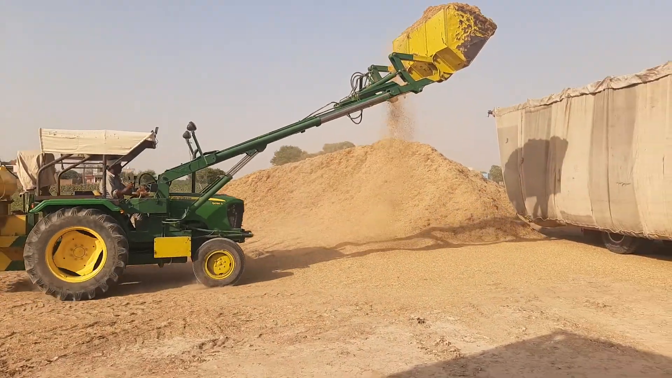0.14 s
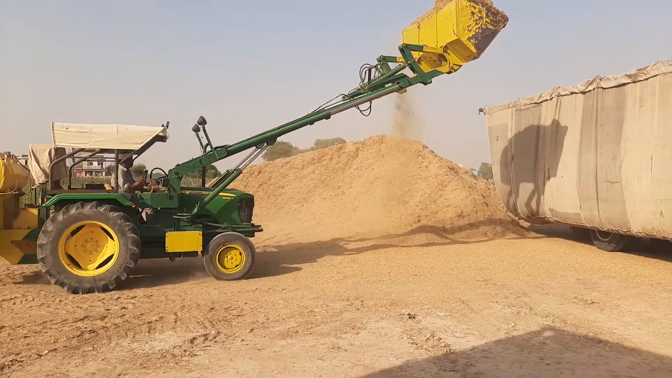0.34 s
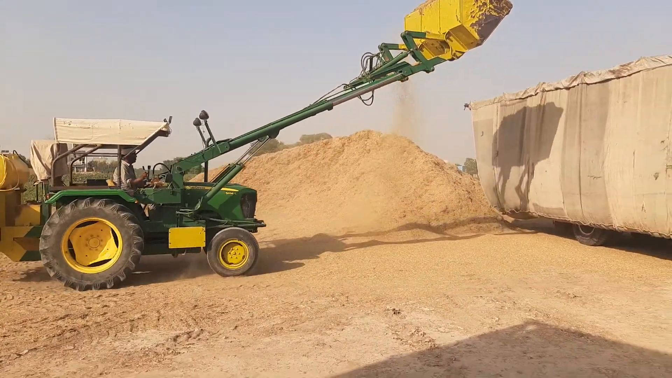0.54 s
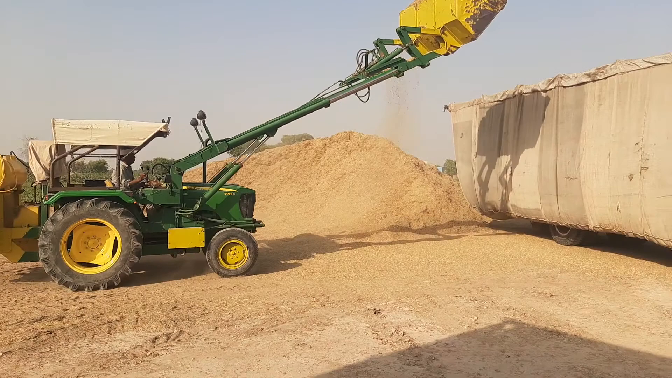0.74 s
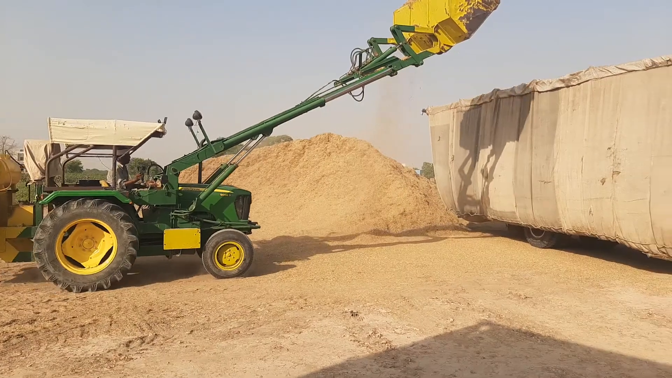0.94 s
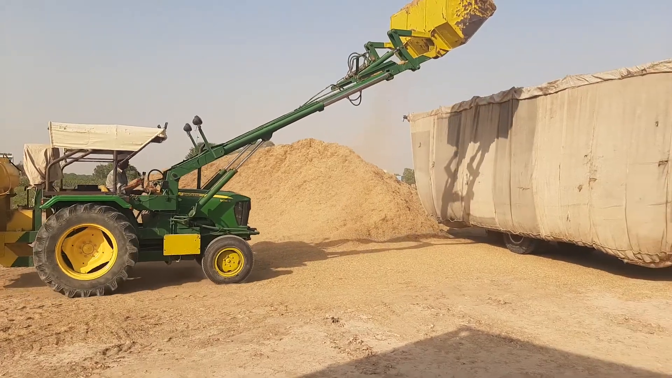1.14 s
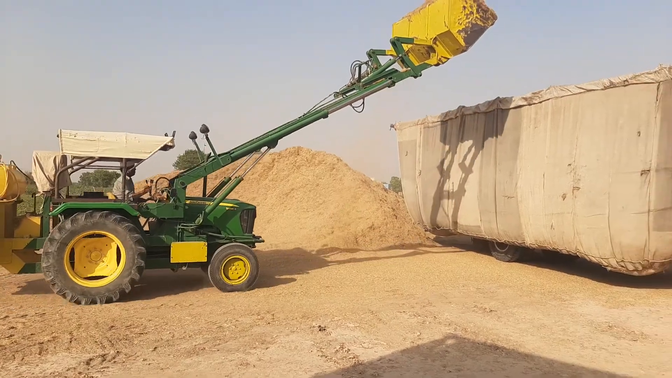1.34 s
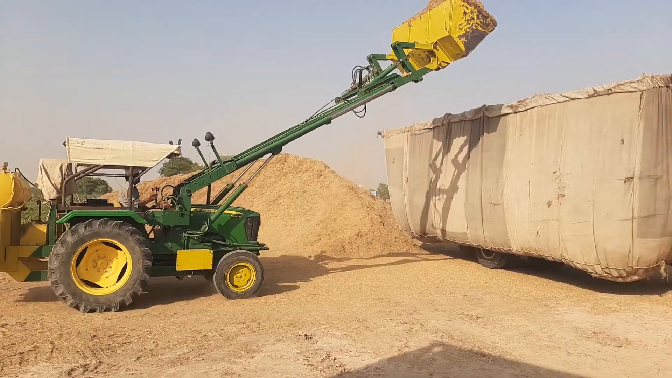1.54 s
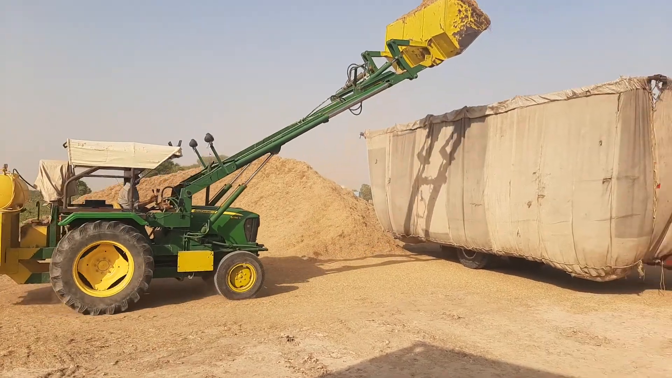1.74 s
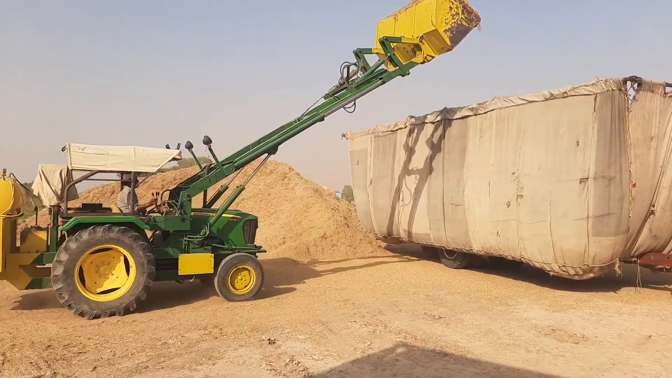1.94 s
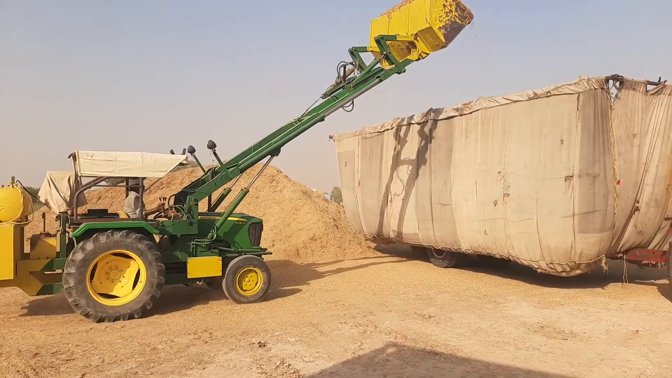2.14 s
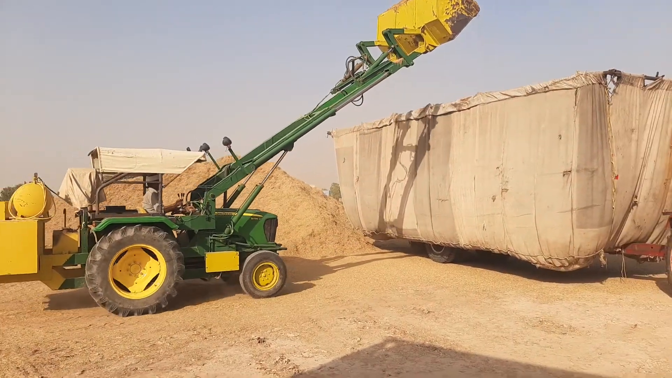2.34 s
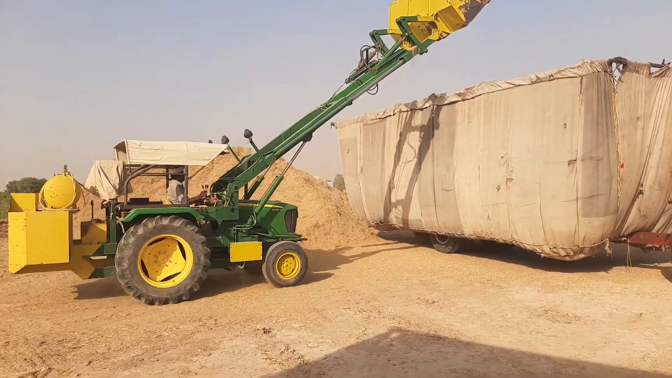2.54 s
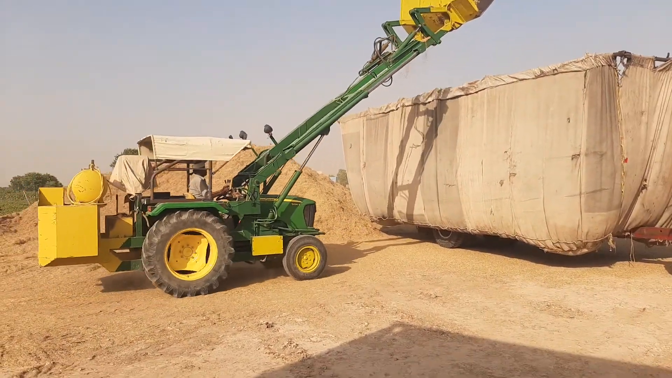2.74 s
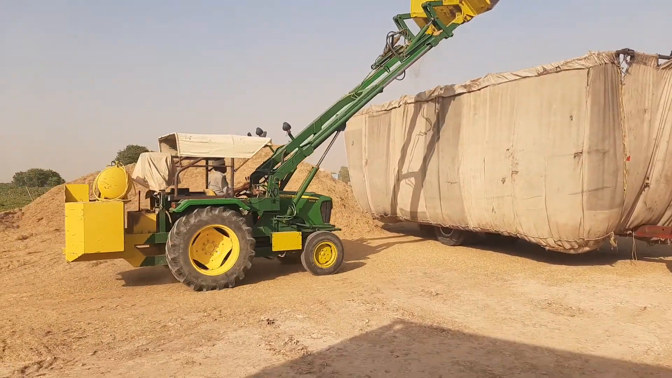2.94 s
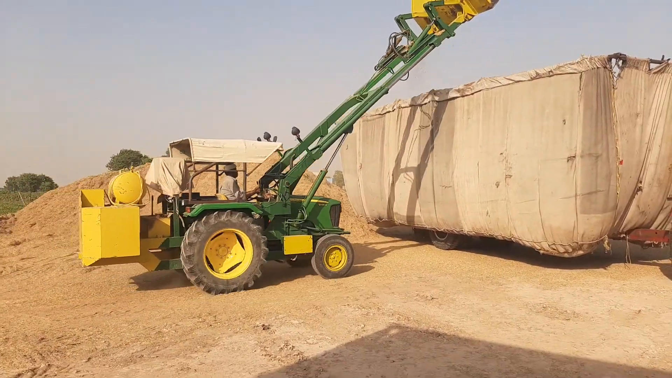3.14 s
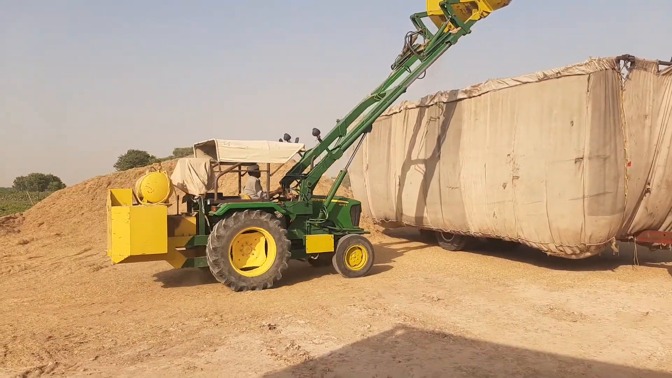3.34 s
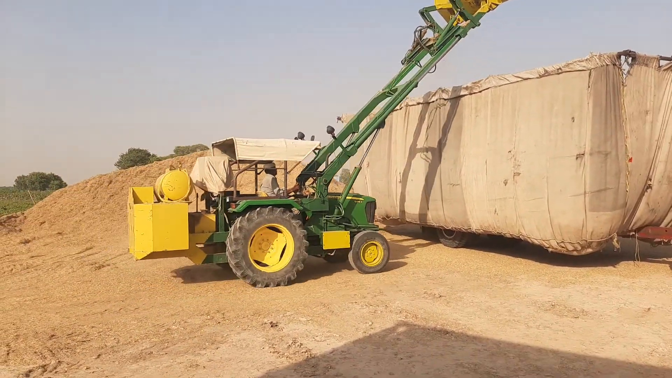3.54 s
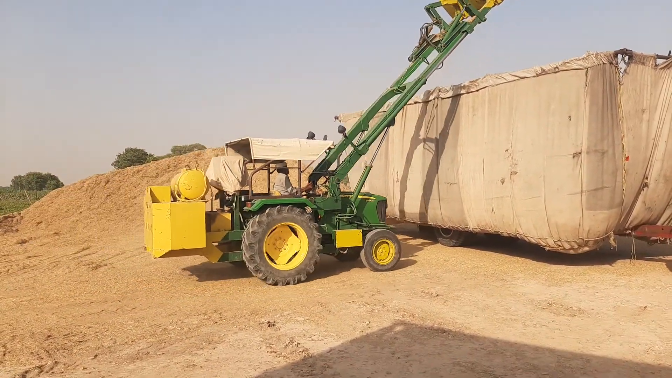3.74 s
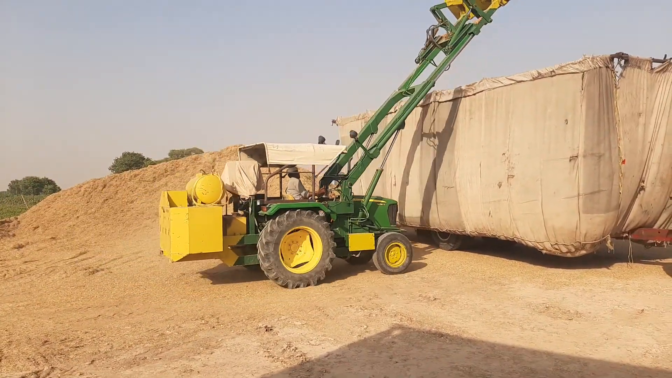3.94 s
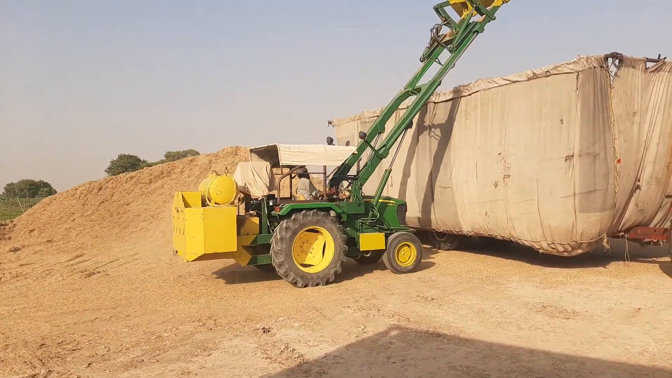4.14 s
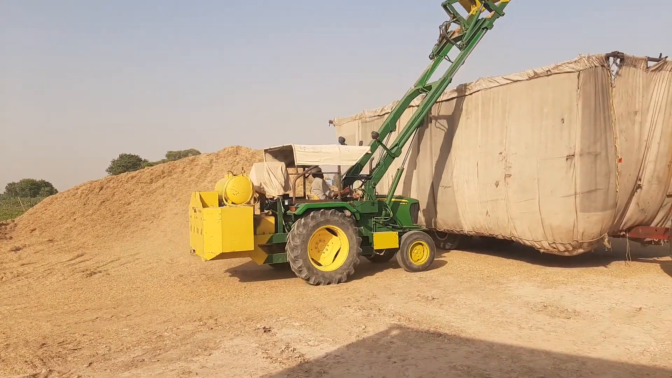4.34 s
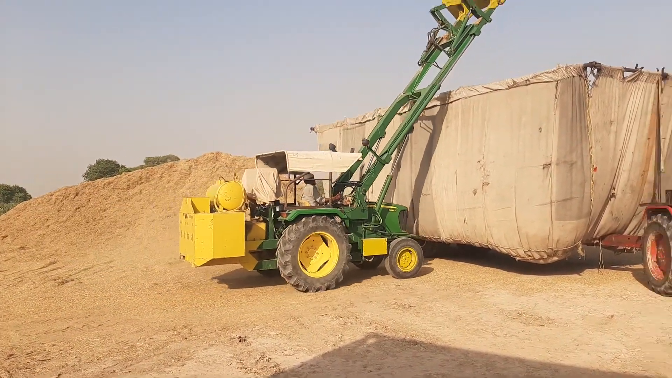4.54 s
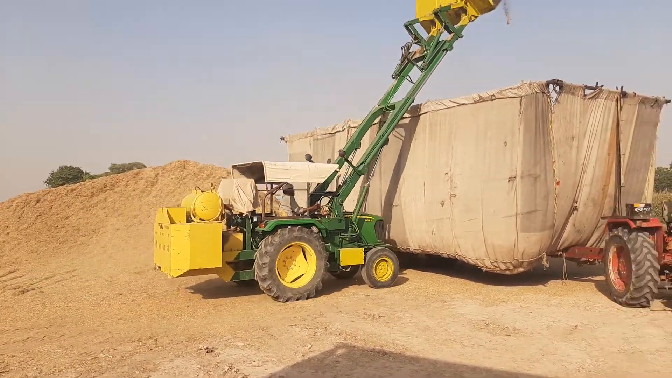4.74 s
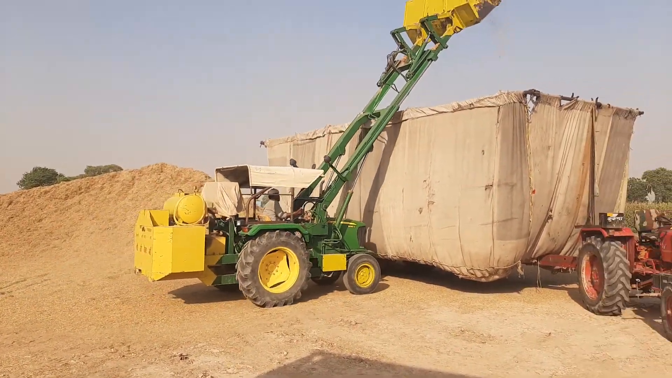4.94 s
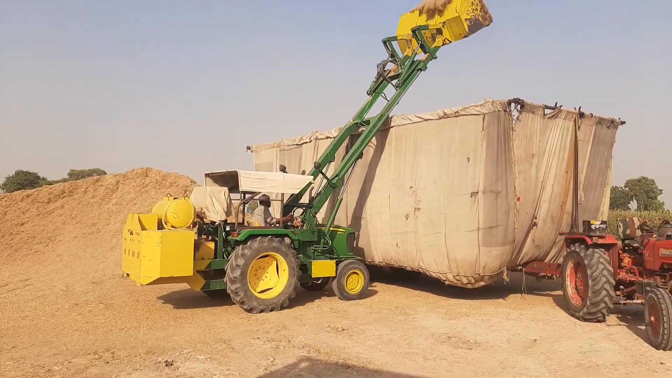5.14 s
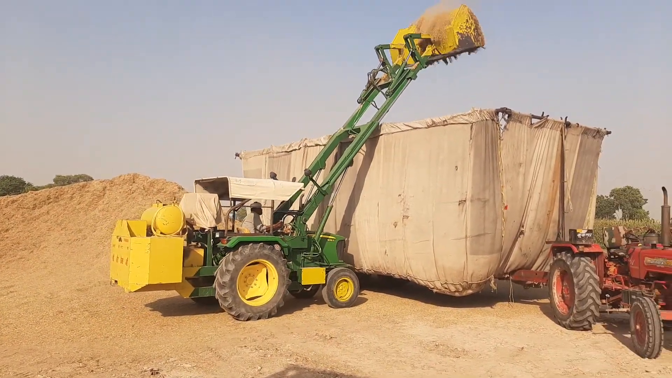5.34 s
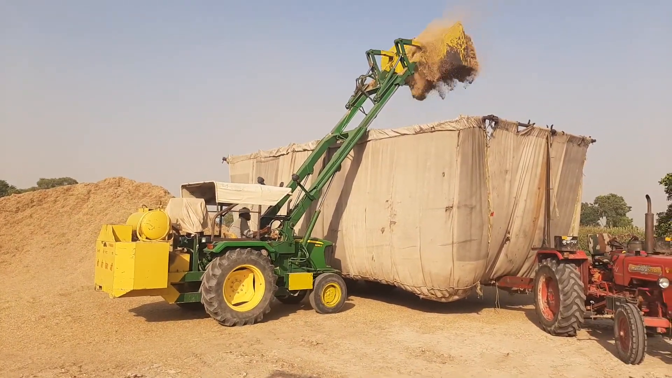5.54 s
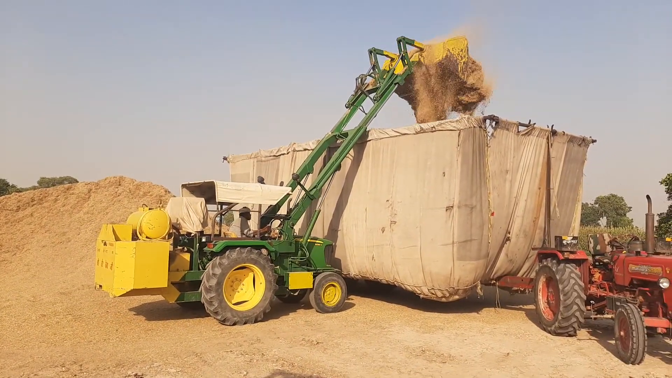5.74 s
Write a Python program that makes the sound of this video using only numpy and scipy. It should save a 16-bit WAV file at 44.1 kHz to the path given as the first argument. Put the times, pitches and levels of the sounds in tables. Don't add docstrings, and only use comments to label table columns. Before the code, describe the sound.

Outdoors in an open yard, a diesel tractor works under load with a deep humming exhaust, clattering block, fan roar and wavering hydraulic pump whine. Just before four seconds the throttle lifts; the pitch slides down and the roar thins. Short metallic loader knocks follow, then a slow, lumpy idle. A small two-port microphone hears it from fairly close.

```python
import sys
import numpy as np
from scipy import signal
from scipy.io import wavfile
from scipy.ndimage import uniform_filter1d

SR = 44100
rng = np.random.default_rng(int(sys.argv[2]) if len(sys.argv) > 2 else 0)


def to_wav(s):
    ch = np.atleast_2d(s).T
    pcm = np.round(np.clip(ch, -1, 1) * 32767)
    wavfile.write(sys.argv[1], SR, pcm.astype(np.int16))


def volts(x):
    e = np.asarray(x, float) / 20
    return 10 ** e


N = 259308
T = np.arange(N) / SR

# time in seconds, firings a second.
GOVERNED_SPEED = [(0, 42.44), (.4, 42.15), (.8, 42.13), (1.0, 41.76), (1.8, 42.14), (2.0, 41.9),
                  (2.2, 41.94), (2.4, 41.55), (2.8, 42.03), (3.0, 41.95), (3.4, 41.3), (3.7, 41.3)]
LIFT_S, SAG_PER_S = 3.7, 20.8
KNEE, IDLE_RATE = 2.5, 19.05
CUT_S, CATCH_S = 3.73, 5.04
# time in seconds, share of the way (0-1).
WAY_OFF = [(0, 0), (1.7, 0.34), (2.4, 0.58), (3.6, 1)]

# firing order, then level in dB near, far, coasting, dragging and idling.
EXHAUST_ORDERS = [(1, -33.5, -33.5, -28.5, -66, -69), (2, -20, -21.5, -30, -63, -60.5),
                  (3, -26.5, -24.5, -30.5, -43, -42), (4, -21.5, -28.5, -55, -41, -59),
                  (5, -56.5, -42, -37, -48, -31), (6, -39, -52, -39.5, -58, -39.5),
                  (7, -47, -76, -54, -53, -55), (8, -64, -63, -59, -45, -49), (10, -60, -55, -61, -53, -43)]
# order, level in dB.
UNEVEN_ORDERS_NEAR = [(0.333, -43), (0.667, -42), (1.0, -13), (1.33, -25), (1.67, -26), (2.0, 0),
                      (2.33, -23), (2.67, -20), (3.0, -5), (3.33, -20), (3.67, -10), (4.0, -1), (4.33, -11),
                      (4.67, -11), (5.0, -21), (5.33, -22), (5.67, -24), (6.0, -20), (6.33, -29),
                      (6.67, -31), (7.0, -30), (7.33, -25), (7.67, -30), (8.0, -20), (8.33, -29),
                      (8.67, -37), (9.0, -32), (9.33, -35), (9.67, -34), (10.0, -32)]
# order, level in dB.
UNEVEN_ORDERS_FAR = [(0.333, -41), (0.667, -40), (1.0, -13), (1.33, -21), (1.67, -24), (2.0, 0),
                     (2.33, -23), (2.67, -21), (3.0, -3), (3.33, -21), (3.67, -13), (4.0, -5), (4.33, -18),
                     (4.67, -14), (5.0, -17), (5.33, -26), (5.67, -27), (6.0, -23), (6.33, -31),
                     (6.67, -33), (7.0, -27), (7.33, -20), (7.67, -24), (8.0, -11), (8.33, -23),
                     (8.67, -29), (9.0, -22), (9.33, -25), (9.67, -26), (10.0, -24)]
# time in seconds, extra level in dB, length in seconds.
FIRING_SWELLS = [
    (5.455, 7, 0.015),
    (5.28, -7, 0.02),
    (5.17, -3, 0.04),
    (5.66, -2, .08),
    (7.2, 6, 0.061),
    (0.038, -2.5, 0.13),
]
# time in seconds, extra level in dB, length in seconds.
TURN_SWELL = [
    (2.25, 16.5, 0.3),
]
# time in seconds, strength in dB.
PUFF_LEVEL = [
    (3.74, -44),
    (4.2, -43),
    (4.5, -32),
    (4.7, -52),
    (5.0, -58),
    (5.2, -52),
    (5.45, -45),
    (5.7, -58),
    (5.88, -38),
]
# frequency in Hz, width in Hz, level in dB.
PIPE_MODES = [(195.7, 17, 22), (327, 7.3, -1), (399, 2.4, -23)]

# time in seconds, whine in dB.
PUMP_WHINE = [(0, -38.5), (.4, -38.5), (.75, -43.5), (1.1, -34), (1.4, -42), (1.75, -34), (2.05, -41),
              (2.4, -56), (2.65, -44), (3.2, -37), (3.55, -36.5), (3.74, -35.5), (3.9, -42)]

# time in seconds, level in dB, main ring in Hz, rattle length in seconds.
LOADER_KNOCKS = [
    (4.379, -30, 1500, 0.068),
    (4.456, -34, 1160, 0.051),
    (4.787, -34.5, 1280, 0.034),
    (5.034, -37, 1450, 0.025),
    (5.836, -39, 1050, .03),
]
# frequency in Hz, width in Hz, level in dB.
ARM_MODES = [(225, 15, 2.5), (440, 52, 2), (708, 49, 3), (806, 44, -0.5), (1200, 230, 4), (1990, 46, -12),
             (2780, 88, -6)]

# frequency in Hz, level in dB per Hz.
COLOUR_LOADED = [(24, -39), (40, -3), (71, -6), (123, -23.5), (170, 6.5), (287, -33.5), (342, -21),
                 (510, -29.5), (670, -18.5), (1100, -31), (1530, -25), (1730, -29.5), (2220, -30.5),
                 (7170, -50), (15500, -52.5)]
# frequency in Hz, level in dB per Hz.
COLOUR_TURNED = [(24, -39), (40, -12), (66, -7), (106, -9), (183, -1), (273, -22), (333, -11.5), (522, -26),
                 (687, -20), (1080, -29), (1530, -23), (1730, -30.5), (2060, -25.5), (8760, -43),
                 (15500, -45.5)]
# frequency in Hz, level in dB per Hz.
COLOUR_IDLING = [(24, -38), (40, -12), (98, 10.5), (154, -20.5), (241, -15), (359, -11.5), (510, -30),
                 (638, -17), (927, -28.5), (1490, -27), (1650, -29), (2010, -24.5), (2780, -25),
                 (7170, -46.5), (15500, -55.5)]
# frequency in Hz, width in Hz, level in dB.
PANEL_MODES = [(799, 240, 6), (1547, 37, 5), (2040, 55, 7), (2756, 84, 4.5), (536, 114, -3.5),
               (1160, 270, 2), (1680, 190, -6.5), (9030, 2700, -4.5), (12500, 1600, 2)]
# full level in dB, eased change in dB, far change in dB.
PART_LEVELS = [
    (-35.5, -8.5, -1),
    (-32.5, -10, .5),
    (-45.5, -10.5, 1),
    (-47.5, -12, -1),
]
PART_GAIN_DB = [0.41, 1.06, 1.6, 2]
# time in seconds, share (0-1).
EASED = [(0, 0), (1.5, 0.03), (2.0, 0), (3.0, 0), (3.62, 0.02), (3.85, 0.35), (4.0, 0.39), (4.15, 0.45),
         (4.4, 0.53), (4.55, 0.86), (4.72, 1), (5.05, 0.97), (5.2, 0.84), (5.3, 0.8), (5.42, 0.63),
         (5.7, 0.71), (5.8, 0.55), (5.88, 0.74)]
# time in seconds, extra level in dB, length in seconds.
VALVE_HISS = [
    (1.95, 2, 0.52),
    (4.57, 6, .05),
    (5.44, 2, 0.056),
    (5.85, 2, 0.073),
]
# frequency in Hz, share that repeats every engine cycle.
CYCLE_SHARE = [(100, 0.0087), (400, 0.38), (800, 0.029), (1500, 0.59), (2200, 0.07), (3500, 0.3),
               (6000, 0.056)]
CYCLE_BLOWS = [
    (.27, 3.8),
    (.6, 1.3),
    (0.941, 0.6),
    (.1, 0.41),
    (0.438, 1.5),
    (.77, 0.19),
]

# frequency in Hz, left-right likeness (0-1).
PORT_LIKENESS = [(100, 1), (250, 0.95), (500, 0.71), (1000, 0.58), (2000, 0.093), (4000, 0.24),
                 (15000, 0.1)]
# frequency in Hz, radians by which left leads.
LEFT_LEAD = [(0, -1.5), (860, 0.5), (3190, 10), (5340, 17.5), (9820, 33), (15200, 64)]
# time in seconds, share of the left lead.
LEAD_SHARE = [(0, 0.84), (.9, 0.91), (1.2, 0.29), (2.7, 0.19), (3.7, 0.032), (4.2, 0.057), (5.88, 0.036)]
# frequency in Hz, left over right in dB.
PORT_TILT = [(60, -10.5), (130, 10.5), (290, -4.5), (640, 2.5), (1410, -2.5), (3100, -2.0), (6820, -2.0),
             (15000, -5)]


def engine_speed():
    above_idle = GOVERNED_SPEED[-1][1] - IDLE_RATE - SAG_PER_S * (T - LIFT_S)
    slowing = IDLE_RATE + KNEE * np.logaddexp(0, above_idle / KNEE)
    return np.where(T < LIFT_S, curve(GOVERNED_SPEED)[0], slowing)


def exhaust(turns):
    wobble_db = 0.4 + 2.0 * np.clip(T - CUT_S, 0, 1)
    hum = sum(order_tone(turns, row[0], order_db(*row), wobble_db) for row in EXHAUST_ORDERS)
    hum *= volts(bumps(FIRING_SWELLS))
    loaded = np.interp(T, [3.71, 3.74, 4.4], [1, 0.25, 0])
    for (order, near_db), (_, far_db) in zip(UNEVEN_ORDERS_NEAR, UNEVEN_ORDERS_FAR):
        third = round(3 * order)
        db = np.interp(T, [1.4, 2.4], [near_db - 23.5, far_db - 26.5])
        if third % 3 or third in (21, 27, 30):
            hum += loaded * order_tone(turns, third / 3, db, wobble_db=0.0)
    return hum


def order_db(order, near_db, far_db, coast_db, drag_db, idle_db):
    pull_db = near_db + (far_db - near_db) * curve(WAY_OFF)[0]
    if order < 3:
        pull_db += bumps([(1.74, -3.5, 0.71)])
    if order == 10:
        pull_db += bumps(TURN_SWELL)
    fuelled = np.clip((CUT_S - T) / 0.018 + 0.5, 0, 1)
    caught = np.clip((T - CATCH_S) / 0.058 + 0.5, 0, 1)
    coast = volts(coast_db - 32 * (T - CUT_S) ** 2)
    drag_or_idle = volts(drag_db + (idle_db - drag_db) * caught)
    slow = np.sqrt(coast ** 2 + drag_or_idle ** 2)
    return 20 * np.log10(fuelled * volts(pull_db) + (1 - fuelled) * slow)


def order_tone(turns, order, db, wobble_db):
    rate = np.diff(turns, prepend=0) * SR
    whole = round(order)
    flip = np.pi * np.clip((150 - whole * rate) / 16 + 0.5, 0, 1)
    phase = 2 * np.pi * order * turns - 0.1 * whole ** 2 + flip
    if whole == 4:
        phase += 1.8 * (curve(WAY_OFF)[0] - 0.3)
    if order % 1:
        phase += np.pi / 2 + 8 * (order - whole)
    return np.sqrt(2) * volts(db + wobble_db * drift(17.0)) * np.cos(phase)


def puffs(turns):
    fired = np.diff(np.floor(turns), prepend=0) > 0
    uneven_db = 2.0 * rng.standard_normal(400)
    rung = ring(fired * volts(uneven_db[turns.astype(int)]), PIPE_MODES)
    level = np.sqrt(uniform_filter1d(rung ** 2, 12000) + 1e-12)
    return rung / level * volts(curve(PUFF_LEVEL)[0]) * (T > PUFF_LEVEL[0][0])


def pump(turns):
    high_db = curve(PUMP_WHINE)[0]
    turned_to_us = np.clip((T - 2.36) / 0.27 + 0.5, 0, 1)
    facing = turned_to_us * np.clip((CUT_S - T) / 0.036 + 0.5, 0, 1)
    low_db = (1 - facing) * (high_db.clip(-46) - 3.5) + facing * -30.5
    alive = np.clip((PUMP_WHINE[-1][0] - T) / 0.06, 0, 1)
    low = order_tone(turns, 8, low_db, wobble_db=0.8)
    high = order_tone(turns, 16, high_db, wobble_db=0.8)
    return alive * (low + high)


def knocks():
    out = np.zeros(N)
    t = np.arange(8000) / SR
    for s, db, hz, length in LOADER_KNOCKS:
        start = round(s * SR)
        rattle = rng.laplace(size=8000) * np.clip(t / 0.004, 0, 1) * np.exp(-(t / length) ** 4)
        rung = ring(rattle, ARM_MODES + [(hz, 60, 2)])
        knock = volts(db) * rung / rung[:round(length * SR)].std()
        out[start:][:8000] += knock[:N - start]
    return out


def cycle_rattle(turns):
    cycle, place = np.divmod(turns / 3, 1)
    fresh = rng.standard_normal((2, 100, 4096))
    patterns = signal.lfilter([1], [1, -0.881], fresh, axis=1)[:, 20:]
    bursts = sum(size * np.exp(-((place - at) % 1) / 0.0079) for at, size in CYCLE_BLOWS)
    blows = 1 + np.gradient(turns) * SR / GOVERNED_SPEED[0][1] * bursts
    return evened(patterns[:, cycle.astype(int), (place * 4096).astype(int)] * blows)


def parts_db(t):
    eased, way = curve(EASED, t)[0], curve(WAY_OFF, t)[0]
    levels = [full + ease_db * eased + far_db * way for full, ease_db, far_db in PART_LEVELS]
    levels[-1] = levels[-1] + bumps(VALVE_HISS, t)
    return levels


def roar_colour(t, hz):
    patches = rng.standard_normal((len(hz), len(t)))
    patches = evened(uniform_filter1d(uniform_filter1d(patches, 10, 1), 12, 0))
    idle = np.clip((t - 3.7) / 1.1, 0, 1)
    far = np.clip((t - 1.4) / 1.0, 0, 1)
    colour = np.outer(read(COLOUR_LOADED, hz), 1 - far)
    colour += np.outer(read(COLOUR_TURNED, hz), far - idle)
    colour += np.outer(read(COLOUR_IDLING, hz), idle)
    colour -= 7.2 * np.clip((260 - hz) / 80, 0, 1)[:, None]
    colour += sum(db / (1 + (2 * (hz - f) / w) ** 2) for f, w, db in PANEL_MODES)[:, None]
    ranges = [(400, 1000), (1000, 4000), (4000, 9000), (9000, 15500)]
    lift = []
    for (lo, hi), db in zip(ranges, parts_db(t)):
        power = (volts(colour[(hz > lo) & (hz < hi)]) ** 2).sum(0)
        lift.append(db - 10 * np.log10(power))
    place = np.interp(np.log(hz + 1), np.log([700, 1900, 5600, 11000]), np.arange(4))
    share = np.clip(1 - abs(place[:, None] - np.arange(4)), 0, 1)
    return colour + share @ (np.array(lift) + np.c_[PART_GAIN_DB]) + 0.77 * patches


def roar(turns):
    frames, hz = N // 256 + 5, np.fft.rfftfreq(1024, 1 / SR)
    t = np.arange(frames) * 256 / SR
    a, b, c, d = rng.standard_normal((4, 513, frames))
    colour = roar_colour(t, hz)
    locked = np.clip(read(CYCLE_SHARE, hz), 0, 1)[:, None]
    rattle = np.pad(cycle_rattle(turns), ((0, 0), (0, 2048)))
    repeat = signal.stft(rattle, nperseg=1024, noverlap=768)[2][..., :frames]
    repeat *= np.sqrt(2 * locked) / np.sqrt(np.mean(abs(repeat) ** 2))
    left, other = repeat + np.sqrt(1 - locked) * np.array([a + 1j * b, c + 1j * d])
    same = np.clip(read(PORT_LIKENESS, hz), 0, 1)[:, None]
    lag = np.exp(-1j * np.outer(read(LEFT_LEAD, hz), curve(LEAD_SHARE, t)[0]))
    right = same * left * lag + np.sqrt(1 - same ** 2) * other
    tilt = volts(read(PORT_TILT, hz) / 2)[:, None]
    spectrum = np.array([left * tilt, right / tilt]) * volts(colour + 1.0)
    noise = signal.istft(spectrum, nperseg=1024, noverlap=768)[1][:, :N]
    throb = 0.5 * np.exp(-(turns % 1) / 0.16) + 0.071 * np.exp(-((turns + 0.5) % 1) / 0.02)
    bright = signal.sosfilt(signal.butter(2, 2500, "high", fs=SR, output="sos"), noise)
    return noise + bright * (throb - throb.mean())


def curve(rows, t=T):
    s, *columns = np.transpose(rows)
    return [np.interp(t, s, c) for c in columns]


def bumps(rows, t=T):
    return sum(db * np.exp(-((t - s) / length) ** 2) for s, db, length in rows)


def read(points, hz):
    f, value = np.transpose(points)
    return np.interp(np.log(hz + 1), np.log(f + 1), value)


def evened(x):
    return x / np.sqrt(np.mean(x ** 2) + 1e-20)


def drift(rate):
    return np.interp(T * rate, np.arange(600), rng.standard_normal(600))


def ring(x, modes):
    t = np.arange(4096) / SR
    tail = 0
    for hz, width, db in modes:
        decay = np.exp(-np.pi * width * t)
        tail = tail + volts(db) * decay * np.sin(2 * np.pi * hz * t) * np.sqrt(width)
    return signal.oaconvolve(x, tail)[:len(x)]


def scene():
    turns = np.cumsum(engine_speed()) / SR
    low = exhaust(turns) + puffs(turns)
    return low + pump(turns) * volts(0) * np.array([[-1], [1]]) * volts([[-1], [1]]) / np.array([[-1], [1]]) \
        + knocks() * volts([[-0.5], [0.5]]) + roar(turns)


def band_limit(x):
    return signal.sosfilt(signal.butter(12, 15690, fs=SR, output="sos"), x)


def record(dry):
    mix = signal.sosfilt(signal.butter(4, 32, "high", fs=SR, output="sos"), dry)
    return band_limit(mix)


dry = scene()
out = record(dry)
to_wav(out)
```